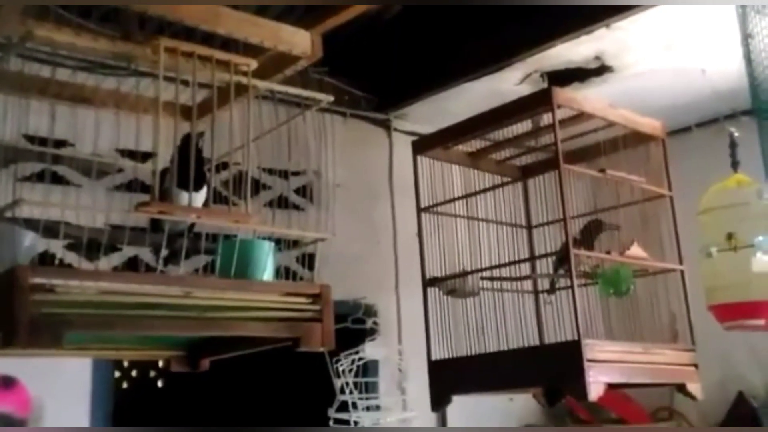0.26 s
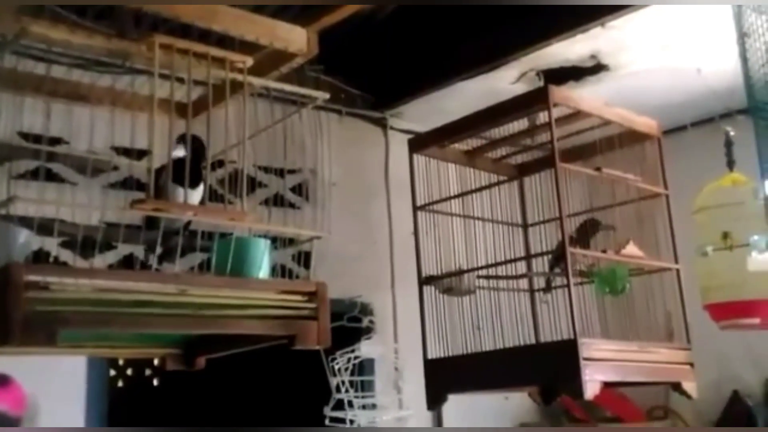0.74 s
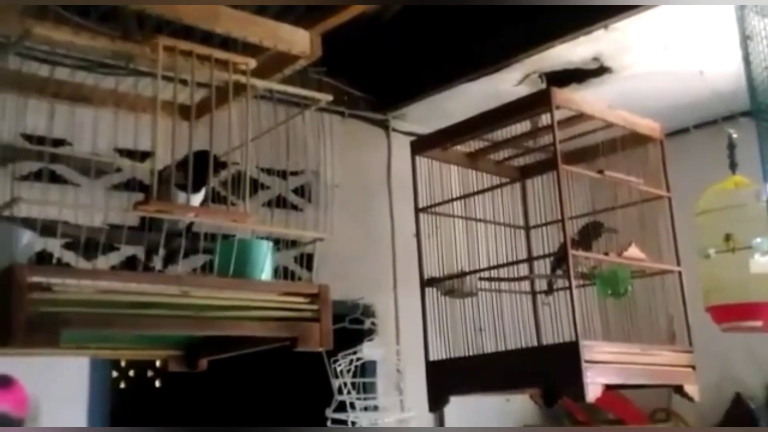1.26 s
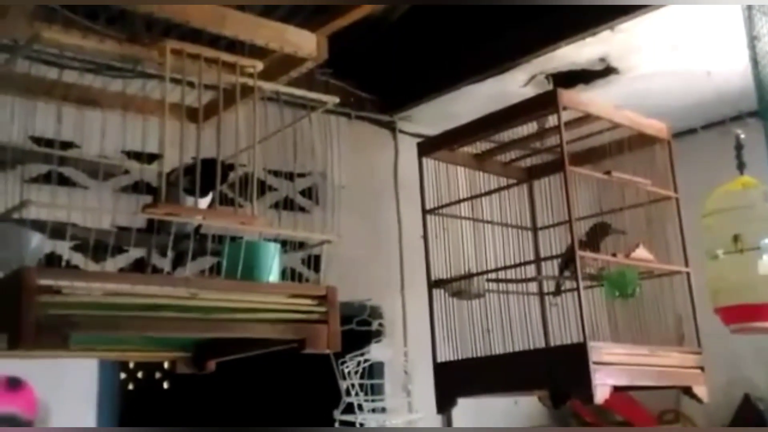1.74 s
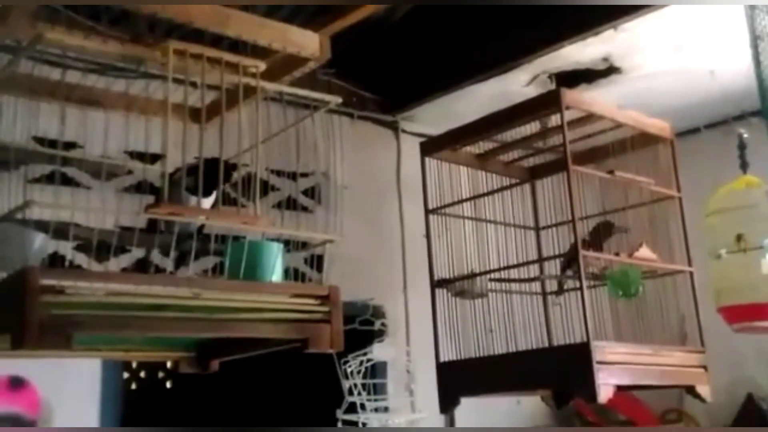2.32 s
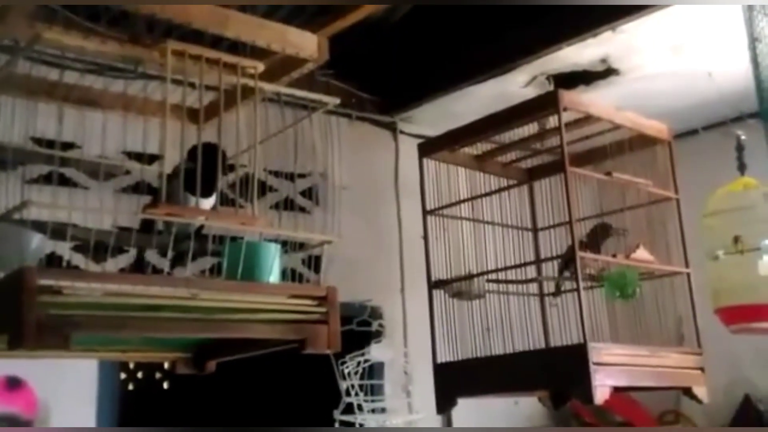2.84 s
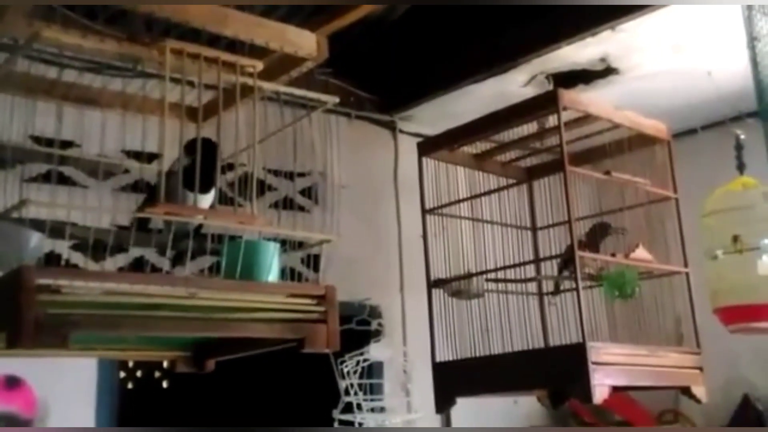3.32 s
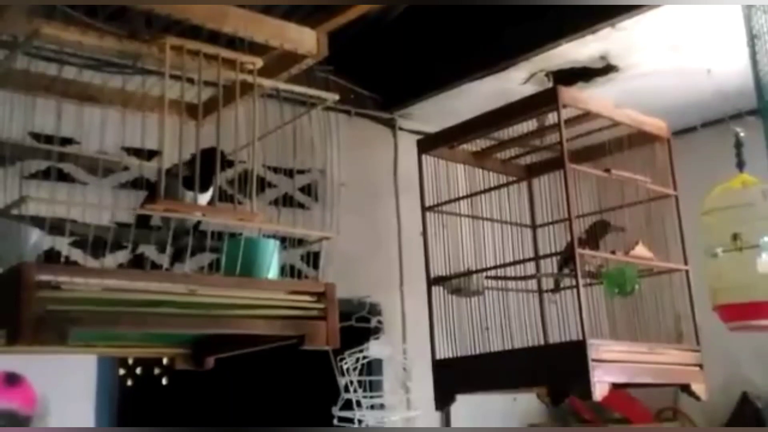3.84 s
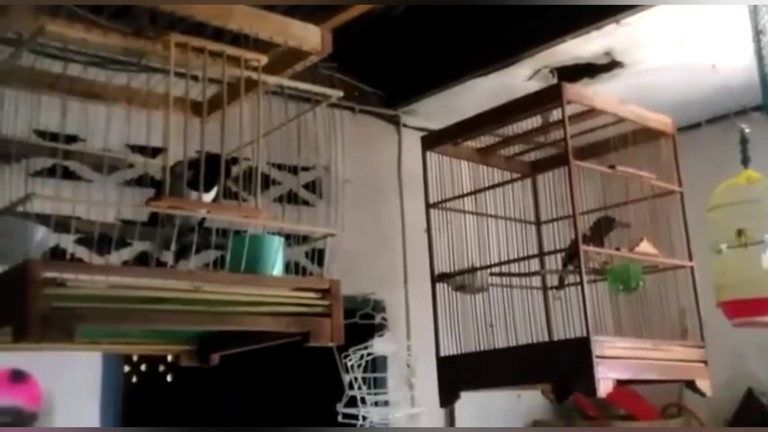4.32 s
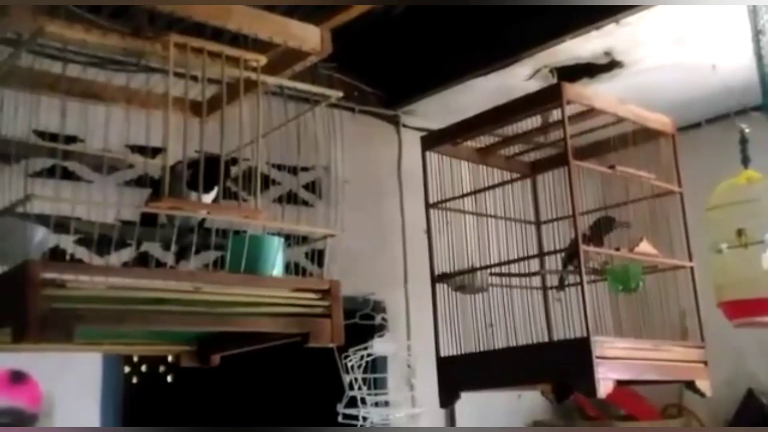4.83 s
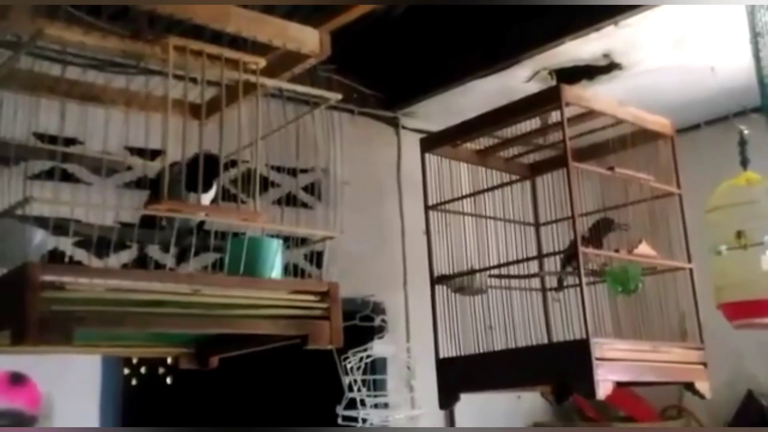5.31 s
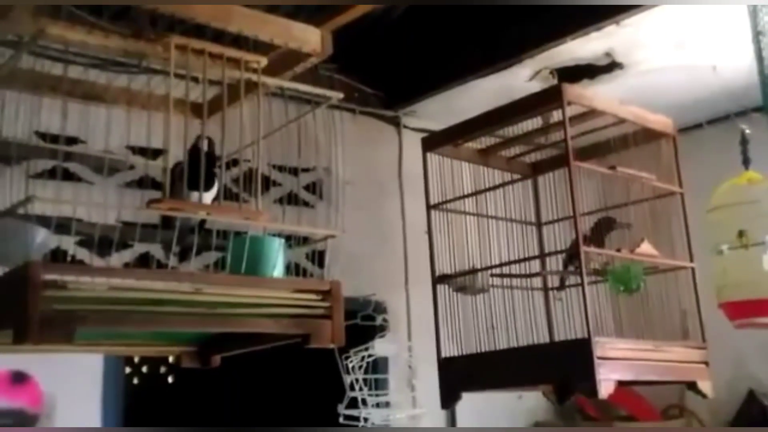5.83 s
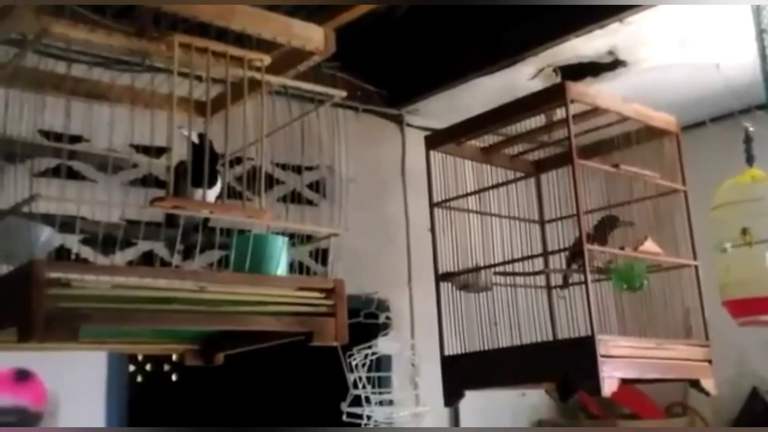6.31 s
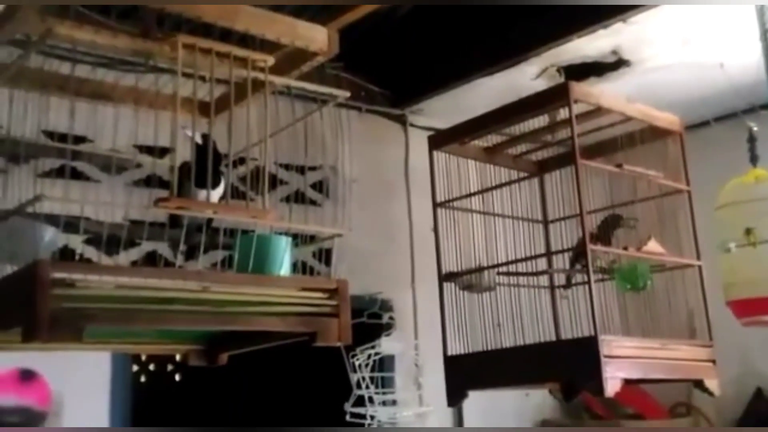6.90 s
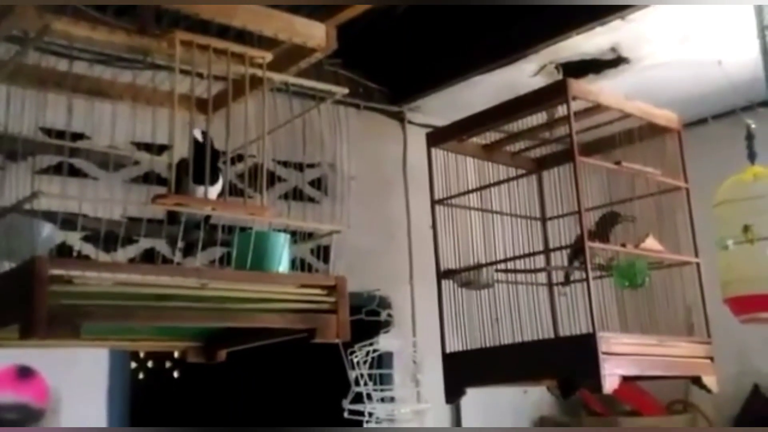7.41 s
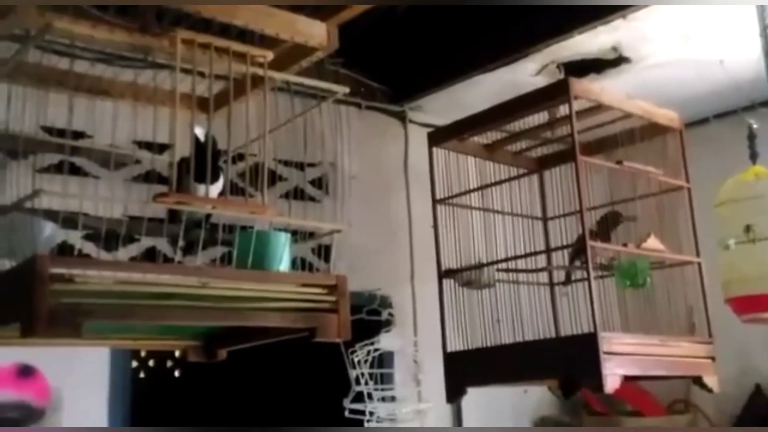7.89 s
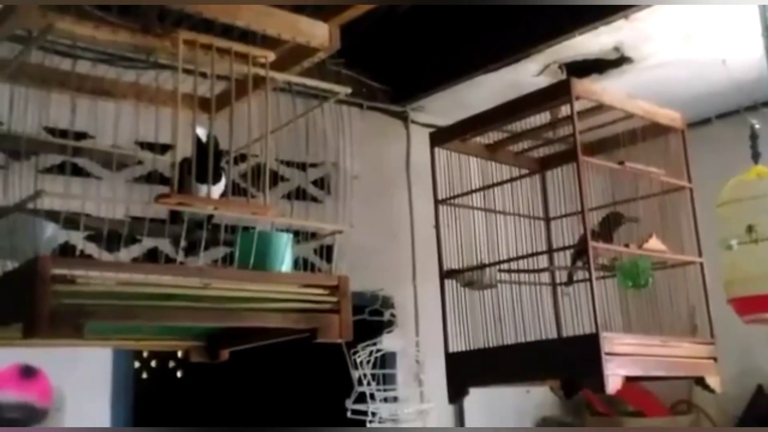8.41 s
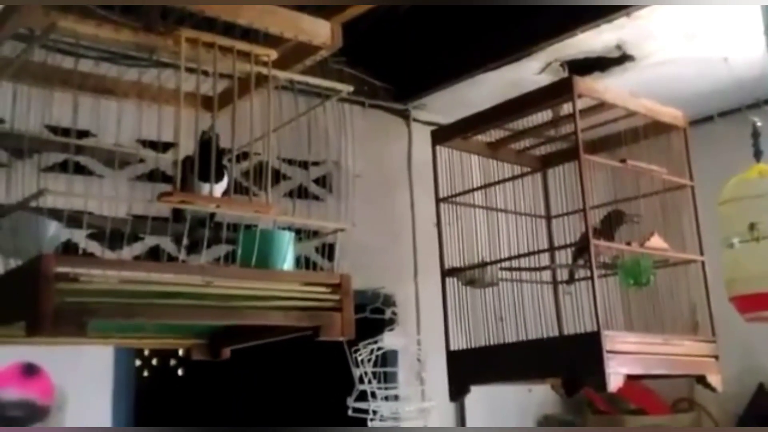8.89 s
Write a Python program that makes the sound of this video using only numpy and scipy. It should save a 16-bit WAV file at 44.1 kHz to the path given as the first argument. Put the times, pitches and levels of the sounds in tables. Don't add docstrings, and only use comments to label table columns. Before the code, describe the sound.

A caged songbird a few metres from a phone sings in a hard-walled house. A clear whistle tail opens, then a low caw with thin squeaks, sharp upward chirps, a quiet gap with soft clucks, a hoarse whistled run, scattered rasps, and a fast, loud flurry of whistles. It ends on sparse squeaks and low notes. Each call echoes about half a second over a low hum.

```python
import sys
import numpy as np
from scipy import signal
from scipy.fft import rfft, irfft, next_fast_len
from scipy.io import wavfile
from scipy.ndimage import uniform_filter1d

SR = 44100
rng = np.random.default_rng(int(sys.argv[2]) if len(sys.argv) > 2 else 0)


def undo_db(level):
    steps = np.asarray(level, float) / 20
    return 10 ** steps


def bounce(signal):
    frames = np.transpose(np.atleast_2d(signal))
    limited = np.clip(frames, -1, 1)
    pcm = np.round(limited * 32767).astype(np.int16)
    wavfile.write(sys.argv[1], SR, pcm)


N = 403515

LONG_VOICE = dict(rough=0.064, octave_db=-37.5, over_db=-19, fade_db=1, haste=1.2, arch=0, attack=0.086, from_db=-8, release=0.087, to_db=-1)
BLIP_VOICE = dict(rough=0.14, octave_db=-21.5, over_db=-14, fade_db=-3, haste=1.5, arch=0, attack=0.15, from_db=-20, release=0.98, to_db=-6.5)
PIPE_VOICE = dict(rough=0.327, octave_db=-16.5, over_db=-11, fade_db=-26, haste=1.5, arch=0, attack=0.39, from_db=-7.5, release=0.36, to_db=-2.5)
HELD_VOICE = dict(rough=0.15, octave_db=-16.5, over_db=-8, fade_db=-5.5, haste=1.2, arch=0, attack=0.14, from_db=-10.5, release=1, to_db=-2.5)
WHISTLE_VOICE = dict(rough=0.114, octave_db=-32.5, over_db=-13, fade_db=-7, haste=1.034, arch=.06, attack=0.2, from_db=-13, release=0.8, to_db=-3)
FALL_VOICE = dict(rough=0.112, octave_db=-22, over_db=-14, fade_db=-2, haste=1.5, arch=0, attack=0.37, from_db=-3.5, release=0.09, to_db=3.5)
LIFT_VOICE = dict(rough=0.2, octave_db=-23.5, over_db=-12, fade_db=-2, haste=0.914, arch=0, attack=0.67, from_db=-13.5, release=0.61, to_db=-7.5)
FLICK_VOICE = dict(rough=0.16, octave_db=-21.5, over_db=-13, fade_db=1.5, haste=4, arch=0, attack=0.35, from_db=-9.5, release=0.33, to_db=-30)
SNAP_VOICE = dict(rough=0.054, octave_db=-18, over_db=-8.5, fade_db=-23, haste=1.9, arch=0, attack=0.79, from_db=-11.5, release=0.17, to_db=7.5)
CHIRP_VOICE = dict(rough=0.33, octave_db=-20, over_db=-26, fade_db=-12, haste=1.07, arch=.84, attack=0.34, from_db=-21, release=0.44, to_db=-9.5, top=0.27, blunt=0.65)
CHUCK_VOICE = dict(rough=0.448, octave_db=-14, over_db=-15, fade_db=9, haste=1, arch=.2, attack=0.16, from_db=-10, release=0.17, to_db=-18)
CROAK_VOICE = dict(rough=0.371, octave_db=-20, over_db=-5.5, fade_db=2, haste=2.24, arch=0, attack=0.42, from_db=-5.5, release=0.39, to_db=-2.5)
SQUAWK_VOICE = dict(rough=0.334, octave_db=13, over_db=21.5, fade_db=-1.5, haste=1.31, arch=0.0195, attack=0.081, from_db=-10, release=1, to_db=-10)
CAW_VOICE = dict(rough=.07, octave_db=13, over_db=32, fade_db=-1.4, haste=0.99, arch=.33, attack=0.35, from_db=-7.5, release=0.32, to_db=-7, odd_db=-5.5, beak=0.51)
HOARSE_VOICE = dict(rough=0.209, octave_db=-19.5, over_db=-12, fade_db=2.2, haste=1.07, arch=0.0143, attack=0.07, from_db=-5, release=0.99, to_db=-4)
DROP_VOICE = dict(rough=0.069, octave_db=-23.5, over_db=-18, fade_db=-1, haste=2.8, arch=0, attack=0.37, from_db=1, release=0.54, to_db=-11.5)
SQUEAK_VOICE = dict(rough=0.268, octave_db=-6.5, over_db=-23.5, fade_db=-2, haste=1.1, arch=.02, attack=0.39, from_db=-1.5, release=0.27, to_db=-2.5)
SLIDE_VOICE = dict(rough=0.06, octave_db=-19, over_db=-17.5, fade_db=7, haste=1.3, arch=0, attack=0.28, from_db=-8.5, release=0.24, to_db=-7)

# start_s, length_s, first_pitch_hz, last_pitch_hz, fundamental_db
LONG_NOTES = [
    (-.06, 0.24, 907.5, 1026, -24.5),
    (.225, 0.047, 1012, 1032, -34),
    (8.22, 0.11, 462.4, 463.7, -47.5),
]
BLIPS = [(7.275, 0.041, 1453, 1341, -22.5), (7.328, 0.016, 1492, 1401, -14.5),
         (7.424, 0.048, 1615, 1630, -34), (9.125, 0.025, 2423, 2444, -25.5), (9.13, .04, 1253, 1170, -35.5)]
PIPES = [
    (1.985, 0.08, 2168, 2813, -22.5),
    (2.152, 0.072, 2696, 2919, -24.5),
    (2.225, 0.0507, 2781, 2671, -25),
]
HELD_NOTES = [(5.976, 0.054, 1498, 1293, -25), (6.064, 0.028, 1863, 1826, -22.5),
              (6.101, 0.063, 1783, 1640, -24.5), (6.336, 0.0498, 1532, 1421, -26.5),
              (6.609, 0.073, 1820, 1681, -34.5), (7.414, 0.025, 1752, 1961, -24),
              (7.426, 0.037, 2025, 2045, -24.5)]
WHISTLES = [(4.856, 0.1756, 866.3, 885, -36), (5.296, 0.082, 944, 900, -31.5),
            (5.386, 0.095, 919, 916, -31.5), (6.465, 0.075, 1061, 1076, -27),
            (7.151, 0.041, 1125, 1090, -28.5), (8.984, 0.094, 873, 897, -28)]
FALLS = [(5.955, 0.049, 990, 839, -35.5), (6.39, 0.08, 1410, 1110, -28.5), (6.75, 0.07, 1442, 1215, -33.5),
         (6.82, .07, 1198, 1091, -27), (6.89, 0.049, 1125, 1393, -29.5), (7.118, 0.0315, 1470, 1212, -36.5),
         (7.535, 0.0616, 1283, 1185, -34)]
LIFTS = [(6.55, 0.11, 1128, 1312, -35.5), (6.933, 0.027, 1390, 1545, -22), (6.953, 0.011, 1567, 1826, -28),
         (7.375, 0.051, 1572, 1710, -20.5), (8.33, 0.059, 481, 805, -43), (8.87, 0.061, 634, 765, -45.5)]
FLICKS = [
    (7.71, 0.032, 1340, 1850, -25.5),
]
SNAPS = [
    (1.543, 0.034, 2320, 3880, -17),
    (1.865, 0.041, 2410, 3757, -30.5),
]
CHIRPS = [
    (1.443, .09, 1319, 1158, -28),
    (1.775, .085, 1279, 1204, -30),
]
CHUCKS = [(2.972, 0.11, 881, 791, -42), (3.175, 0.063, 895, 827, -41.5), (3.595, .1, 750, 705, -46.5),
          (5.565, 0.065, 977, 1104, -51.5)]
CROAKS = [(1.956, 0.042, 994, 1366, -40), (1.961, 0.031, 1957, 2145, -33.5),
          (4.022, 0.026, 2960, 2140, -34.5), (4.491, 0.053, 2610, 3060, -35),
          (5.179, 0.042, 1318, 1382, -45.5), (5.731, 0.082, 730, 682, -44.5),
          (8.346, 0.042, 3400, 2640, -36.5), (8.541, 0.041, 1145, 724, -40.5),
          (8.816, 0.025, 1060, 1025, -46.5), (8.846, 0.028, 798, 622, -49), (8.921, 0.13, 408, 368, -58.5),
          (8.941, 0.025, 1036, 875, -41.5)]
SQUAWKS = [
    (.6, 0.023, 707, 740, -57.5),
    (.615, 0.101, 934, 992, -53),
]
CAWS = [
    (.757, .183, 342.6, 320.5, -58),
]
HOARSE_NOTES = [(4.038, 0.095, 1938, 2024, -24.5), (4.139, 0.064, 1810, 1974, -23),
                (4.206, 0.076, 1956, 1776, -22), (4.279, 0.0403, 1813, 1647, -30.5),
                (4.286, 0.049, 1346, 1581, -31), (8.196, 0.036, 1621, 1402, -31.5),
                (8.241, 0.019, 1450, 1597, -28)]
DROPS = [(6.655, 0.045, 1683, 1287, -31.5), (7.195, 0.077, 1147, 871, -29), (7.6, 0.039, 1185, 872, -27),
         (8.115, 0.14, 988, 492, -55.5)]
SQUEAKS = [(.605, 0.12, 5620, 6000, -40), (.65, .07, 6450, 6400, -38), (.795, 0.07, 6170, 6120, -32),
           (.8, 0.11, 5460, 4950, -39), (.97, 0.18, 4830, 4760, -44.5), (.975, 0.17, 7030, 7000, -46.5),
           (2.09, 0.031, 3300, 3970, -38), (3.19, 0.036, 6090, 5900, -46.5),
           (4.452, 0.022, 5130, 4680, -34.5), (4.485, 0.045, 5020, 6150, -37),
           (4.527, 0.034, 6260, 6990, -33), (4.558, 0.03, 3520, 4300, -31.5),
           (4.585, 0.032, 4500, 4870, -32), (4.605, 0.026, 6050, 5770, -35.5),
           (8.355, 0.055, 5530, 4460, -39), (8.415, 0.059, 4125, 3880, -32.5), (8.55, .05, 4260, 4320, -41)]
SLIDES = [
    (7.996, 0.16, 1377, 946, -36),
]

# start_s, length_s, level_db, throat_hz, hiss_db (hiss above
RASPS = [(0.428, 0.033, -53, 1568, 11), (1.07, 0.055, -49, 5300, 0), (1.953, 0.069, -33, 2260, 7.5),
         (3.612, 0.042, -55, 6360, 11), (4.291, 0.022, -40.5, 5830, 8), (4.804, 0.019, -47.5, 5100, 11),
         (5.153, 0.072, -35, 2840, 13.5), (5.398, 0.072, -30.5, 3100, 14), (5.645, 0.076, -32.5, 3100, 5.5),
         (6.273, 0.027, -51, 2850, 9), (6.332, 0.05, -32, 2330, 22), (6.654, 0.045, -43.5, 2300, 6.5),
         (6.772, 0.02, -39.5, 2200, 9), (8.12, 0.063, -44.5, 1400, -16), (8.49, 0.029, -46, 2120, 5),
         (8.533, 0.053, -34.5, 3300, 9.5),
         (.609, .065, -32, 1800, -15), (.631, 0.099, -41.5, 2980, -4.5), (2.995, 0.074, -50.5, 1180, 0),
          (3.191, 0.05, -55, 1160, -2.5), (3.621, 0.079, -56, 1380, -2.5), (6.962, 0.016, -54.5, 4950, -6)]
# start_s, length_s, level_db, throat_hz, hiss_db
RINGS = [(5.568, 0.071, -34, 2420, -10.5), (8.94, .099, -49.5, 2840, -10.5)]
# start_s, length_s, level_db, throat_hz, hiss_db
CLICKS = [(.781, 0.12, -37, 2100, -8.5), (4.036, 0.014, -44.5, 4001, 15), (4.984, 0.014, -46.5, 2661, 26),
          (5.691, 0.071, -46, 1111, -7.5), (5.9, .025, -37.5, 1670, -3), (8.813, 0.017, -53, 1800, -1.5)]

# pitch_hz, level_db
BEAK = [(1200, 1), (1550, 17), (2600, 0), (3500, -11), (4600, -5.5), (5800, 7.5), (6800, -8.5), (8200, 1.5),
        (10000, -15), (14500, -24)]
# pitch_hz, level_db (per Hz)
HISS = [(1410, -30.5), (2400, -19), (4220, -12.5), (6140, -14), (6530, -11), (8210, -14.5), (9940, -16),
        (14900, -36)]
# pitch_hz, time_s
ROOM_T60 = [(500, 0.42), (1500, 0.57), (3000, 0.55), (6000, 0.51), (12000, 0.25)]
# pitch_hz, level_db (per Hz)
HOUSE = [(15, -64), (25, -20.5), (108, -5), (205, -10.5), (268, -4.5), (306, -9.5), (681, -15.5),
         (758, -16), (866, -15), (1290, -16), (3030, -12), (3560, -19), (4400, -20), (8570, -18.5),
         (14600, -43.5)]
# pitch_hz, width_hz, level_db (over the background)
HUM = [(285, 16, 6.5), (1024, 7.3, 13.5)]
# start_s, level_db (of the house)
GAIN_STEPS = [
    (0, -56),
    (1.242, -58),
    (2.17, -63.5),
]
# pitch_hz, width_hz, level_db
NOTCHES = [(3950, 200, -7), (8420, 1200, -5.5), (11530, 520, -3)]
# pitch_hz (before the shift), level_db
SHIFTED = [(800, -32), (2000, -31.5), (3500, -36.5), (5000, -23), (7000, -22)]

ROOM_DB, SONG_DB = 3, -1.5
EARLY_DB, EARLY_T60 = -3, 0.098
TOP_HZ, SHIFT_HZ = 14740, 7600
GAIN_SLEW_S = 0.13
ARCH_TOP, ARCH_FLAT = 0.4, 0.66
OCTAVE_BEAK = 0.69
THROAT_WIDTH, WIDER_PER_DB, WIDEST_HZ = 0.59, 0.16, 1790
NARROWED, OPENED = 0.39, 3.4


def colour(points, hz):
    at, value = np.transpose(points)
    return np.interp(np.log(np.maximum(hz, 1)), np.log(at), value)


def bumps(points, hz):
    return undo_db(sum(db * np.exp(-0.5 * ((hz - f) / (width / 2)) ** 2) for f, width, db in points))


def shape(x, gain):
    size = next_fast_len(len(x))
    hz = np.arange(size // 2 + 1) * SR / size
    return irfft(rfft(x, size) * gain(hz), size)[:len(x)]


def unit(x):
    return x / np.sqrt(np.mean(x ** 2))


def white_noise(size):
    return rng.standard_normal((size // 4096 + 1) * 4096)[:size]


def flutter(size, rate):
    k = max(int(SR / rate), 2)
    smooth = uniform_filter1d(uniform_filter1d(white_noise(size), k), k)
    return smooth * np.sqrt(1.486 * k)


def fade(size, rise_s, fall_s):
    t = np.arange(size) / SR
    ramp = np.minimum(t / rise_s, (t[-1] - t) / fall_s)
    return np.sin(np.pi / 2 * np.clip(ramp, 0, 1)) ** 2


def add(track, start_s, x):
    i = int(start_s * SR)
    x, i = x[max(-i, 0):], max(i, 0)
    track[i:i + len(x)] += x[:len(track) - i]


def house_hum():
    start_s, level_db = np.transpose(GAIN_STEPS)
    air = shape(rng.standard_normal(N), lambda hz: undo_db(colour(HOUSE, hz)) * bumps(HUM, hz))
    low = shape(air, lambda hz: (hz > 70) & (hz < 380))
    step = np.searchsorted(start_s, np.arange(N) / SR, side="right") - 1
    steps_db = level_db[np.maximum(step, 0)]
    swell_db = uniform_filter1d(steps_db, int(GAIN_SLEW_S * SR)) + 1.0 * flutter(N, 24)
    return air / np.sqrt(np.mean(low ** 2)) * undo_db(swell_db)


def membrane_note(rough, octave_db, odd_db, beak, rows):
    s, hz, low_db, top_db = np.transpose(rows)
    t = np.arange(s[0] - 0.004, s[-1] + 0.013, 1 / SR)
    size = len(t)
    hz, low_db, top_db = (uniform_filter1d(np.interp(t, s, c), size=150) for c in (hz, low_db, top_db))

    shake = 0.282 * rough * flutter(size, 122.0) + rough ** 1.364 * flutter(size, 610)
    phase = 2 * np.pi * np.cumsum(hz + shake * (60 + 0.108 * hz)) / SR

    k = np.arange(3, 17)[:, None]
    uneven_db = 2.0 * rng.standard_normal((len(k), 1))
    weight_db = beak * colour(BEAK, k * hz) + odd_db * (k % 2) + uneven_db
    weight = undo_db(weight_db) * (k * hz < TOP_HZ)
    weight = weight / np.sqrt(np.sum(weight ** 2, axis=0) + 1e-6)
    flicker = undo_db(4.4 * np.array([flutter(size, 59.0) for _ in k]))
    grain = np.array([1 + 0.29 * flutter(size, 520) for _ in k])
    glide = np.abs(np.gradient(np.log(hz))) * SR
    overtones = np.sum(weight * flicker * grain * np.sin(k * phase + k ** 2), axis=0) / (1 + glide / 15)

    breath = unit(shape(white_noise(size), lambda f: undo_db(colour(HISS, f) + 0.5 * np.log2(f / 5000 + 0.01))))
    low = np.sin(phase) + undo_db(octave_db) * flicker[0] * np.sin(2 * phase)
    throb = np.abs(1 + 1.12 * rough * flutter(size, 220))
    voice = undo_db(low_db) * low + undo_db(top_db) * (overtones + undo_db(-14.5) * breath)
    return np.sqrt(2) * voice * throb * fade(size, 0.0054, 0.021)


def sung_note(start_s, length_s, first_hz, last_hz, db, rough, octave_db, over_db, fade_db, haste, arch,
              attack, from_db, release, to_db, top=ARCH_TOP, blunt=ARCH_FLAT, odd_db=0, beak=1):
    u = np.linspace(0, 1, num=13)
    bow = np.sin(np.pi * u ** (np.log(0.5) / np.log(top))).clip(0) ** blunt
    hz = first_hz * (last_hz / first_hz) ** (1 - (1 - u) ** haste) * (1 + arch * bow)
    attack_db = from_db * np.clip(1 - u / attack, 0, 1)
    release_db = to_db * np.clip(1 - (1 - u) / release, 0, 1)
    effort_db = db + attack_db + release_db
    overtone_db = effort_db + over_db + fade_db * u
    octave_db = octave_db + OCTAVE_BEAK * colour(BEAK, 2 * np.mean(hz))
    rows = np.transpose([start_s + length_s * u, hz, effort_db, overtone_db])
    return membrane_note(rough, octave_db, odd_db, beak, rows)


def rasp(length_s, db, throat_hz, width_hz, hiss_db):
    size = int((length_s + 0.057) * SR)
    pitch_hz = (650 + 250 * rng.random()) * (1 + 0.06 * flutter(size, 60) + 0.09 * flutter(size, 700))
    cycles = np.cumsum(pitch_hz) / SR
    slap_strength = 9.3 * undo_db(6.5 * white_noise(size).clip(max=1.7))
    slaps = np.diff(np.floor(cycles), prepend=0) * slap_strength
    puffs = white_noise(size) * 0.5 * np.exp(-(cycles % 1) / 0.51)
    clumps = undo_db(1.4 * flutter(size, 110))
    burst = fade(max(int(length_s * SR), 9), 0.16 * length_s, 0.1 * length_s)
    burst = np.pad(burst, (0, size))[:size]
    ripple = rng.random(2)

    def tract(hz):
        ring = 1 / (1 + ((hz - throat_hz) / (width_hz / 2)) ** 2)
        throat = ring / (1 + (0.5 * throat_hz / (hz + 1)) ** 6)
        hiss = undo_db(hiss_db + colour(HISS, hz)) / (1 + (throat_hz / (hz + 1)) ** 8)
        pipe = undo_db(1.75 * np.cos(2 * np.pi * (hz / (1300 + 500 * ripple[0]) + ripple[1])))
        lag_s = 0.14 * length_s * np.log2(np.clip(hz, 1500, 9000) / 1500)
        delay = np.exp(-2j * np.pi * np.cumsum(lag_s) * hz[1])
        return (throat + 0.5 * hiss) * pipe * delay

    return undo_db(db) * unit(shape((slaps + puffs) * clumps * burst, tract))


def room(x, echoes):
    t = np.arange(int(SR)) / SR
    tail = 0
    for hz, noise in zip(250 * 2 ** np.arange(7), echoes):
        band = shape(noise, lambda f: np.cos(np.pi / 2 * np.clip(np.log2(f / hz + 1e-9), -1, 1)))
        decay = undo_db(-60 * t / colour(ROOM_T60, hz)) + undo_db(EARLY_DB - 60 * t / EARLY_T60)
        tail = tail + band * decay / np.sqrt(np.sum(decay ** 2))
    tail = tail * np.clip((t - 0.003) / 0.0032, 0, 1)
    direct = shape(x, lambda hz: undo_db(-4.0 * np.clip(np.log2(hz / 2200 + 1e-9), 0, 1)))
    return direct + undo_db(ROOM_DB) * signal.fftconvolve(x, tail)[:N]


def scene():
    bird = np.zeros(N)
    echoes = rng.standard_normal((7, int(SR)))
    hum = house_hum()
    song = [(LONG_NOTES, LONG_VOICE), (BLIPS, BLIP_VOICE), (PIPES, PIPE_VOICE),
            (HELD_NOTES, HELD_VOICE), (WHISTLES, WHISTLE_VOICE), (FALLS, FALL_VOICE),
            (LIFTS, LIFT_VOICE), (FLICKS, FLICK_VOICE), (SNAPS, SNAP_VOICE),
            (CHIRPS, CHIRP_VOICE), (CHUCKS, CHUCK_VOICE), (CROAKS, CROAK_VOICE),
            (SQUAWKS, SQUAWK_VOICE), (CAWS, CAW_VOICE), (HOARSE_NOTES, HOARSE_VOICE),
            (DROPS, DROP_VOICE), (SQUEAKS, SQUEAK_VOICE), (SLIDES, SLIDE_VOICE)]
    for notes, voice in song:
        for row in notes:
            add(bird, row[0] - 0.004, sung_note(*row, **voice))
    for calls, opening in ((RASPS, 1), (RINGS, NARROWED), (CLICKS, OPENED)):
        for start_s, length_s, level_db, throat_hz, hiss_db in calls:
            plain_hz = min(throat_hz * (THROAT_WIDTH + WIDER_PER_DB * hiss_db), WIDEST_HZ)
            add(bird, start_s, rasp(length_s, level_db, throat_hz, opening * plain_hz, hiss_db))
    return np.tile(room(bird * undo_db(SONG_DB), echoes) + hum, (2, 1))


def band_limit(x):
    return signal.sosfilt(signal.butter(12, 15060, fs=SR, output="sos"), x)


def record(dry):
    preamp_hiss = undo_db(-71) * shape(rng.standard_normal(N), lambda hz: np.clip(hz / 12000, 0, 1) ** 3)
    mid = shape(dry[0] + preamp_hiss, lambda hz: bumps(NOTCHES, hz) * (hz < TOP_HZ))
    lower = shape(mid, lambda hz: undo_db(colour(SHIFTED, hz)) * (hz > 600) * (hz < TOP_HZ - SHIFT_HZ))
    carrier = np.exp(2j * np.pi * SHIFT_HZ * np.arange(N) / SR)
    mid = mid + np.real(signal.hilbert(lower, next_fast_len(N))[:N] * carrier)

    def treble(hz):
        return 1.0 * ((hz > 5300) * (hz < 8300) + 0.25 * (hz > 11800))

    side = undo_db(-10.5) * shape(shape(mid, treble) * rng.standard_normal(N), treble)
    return band_limit(np.array([mid + side, mid - side]))


dry = scene()
out = record(dry)
bounce(out)
```